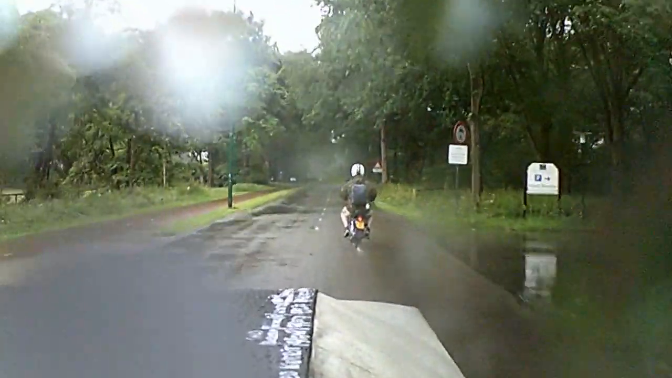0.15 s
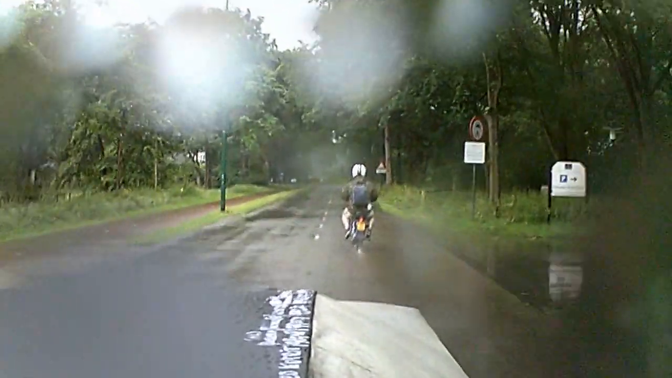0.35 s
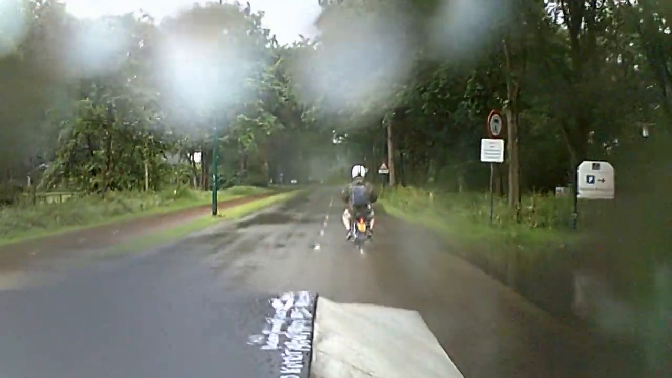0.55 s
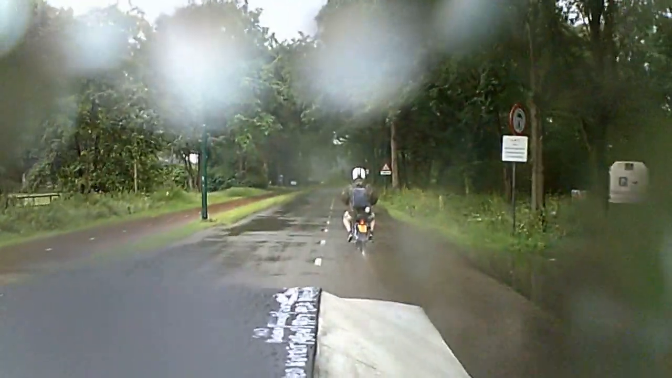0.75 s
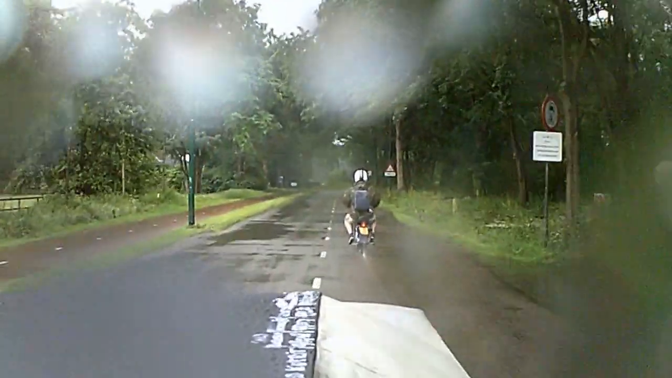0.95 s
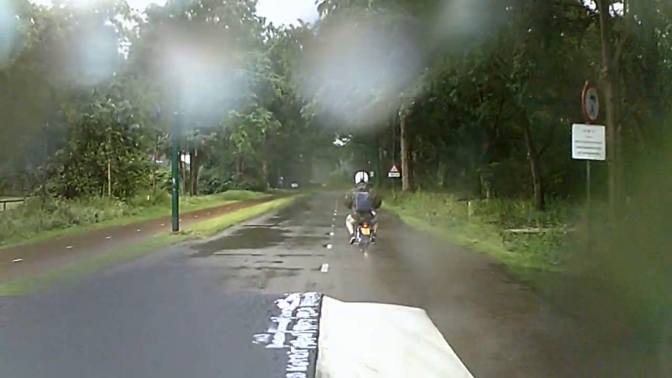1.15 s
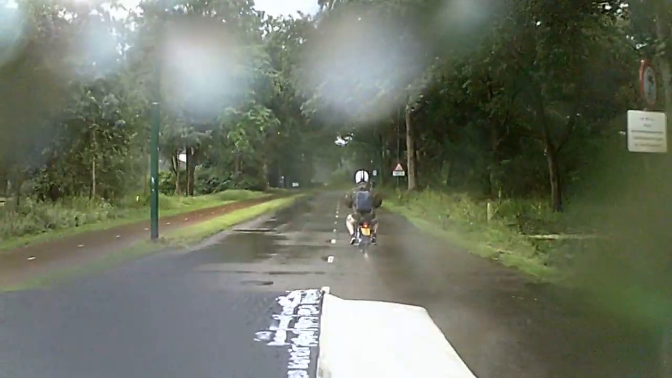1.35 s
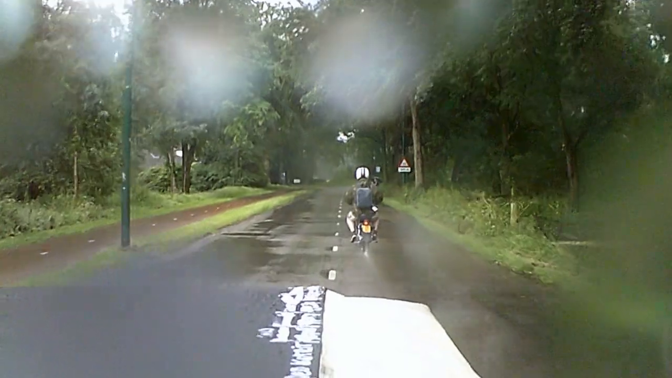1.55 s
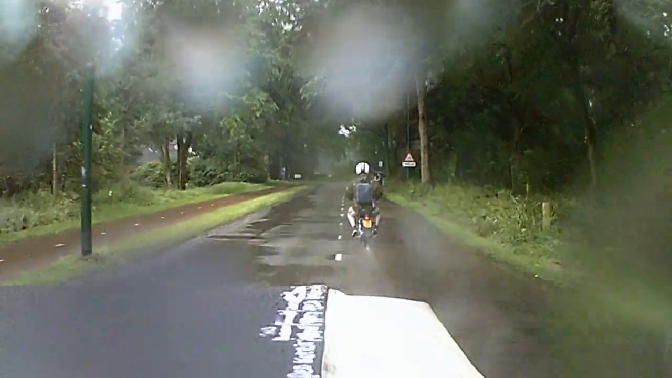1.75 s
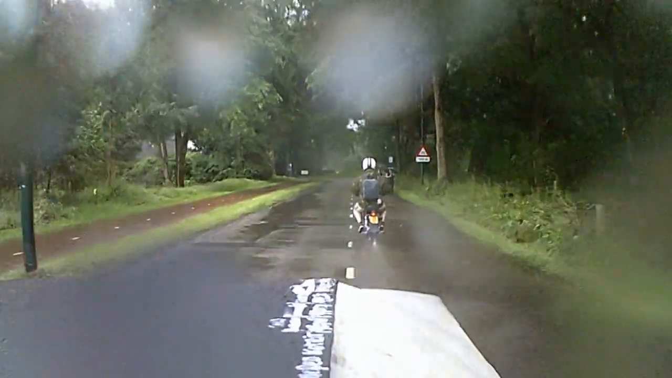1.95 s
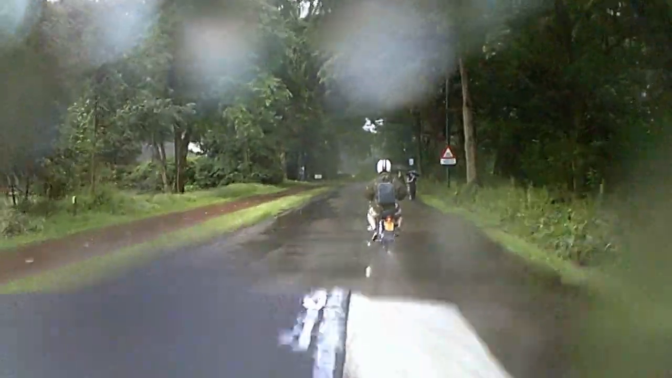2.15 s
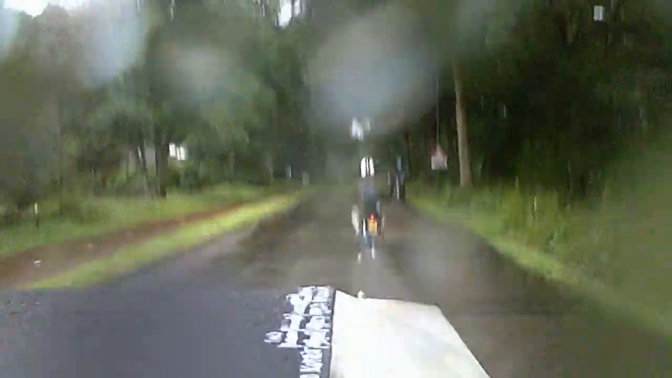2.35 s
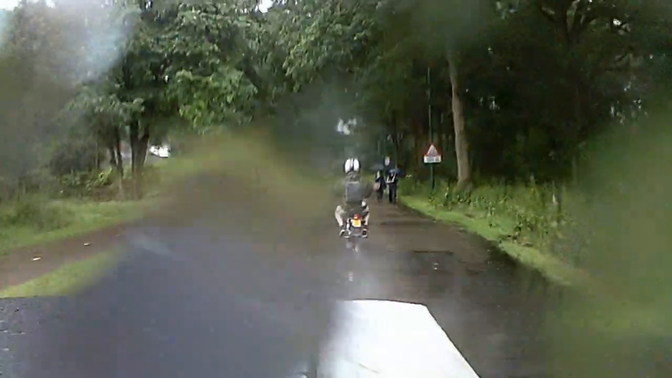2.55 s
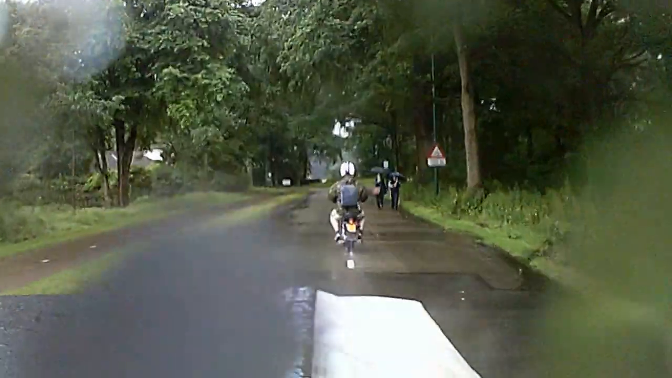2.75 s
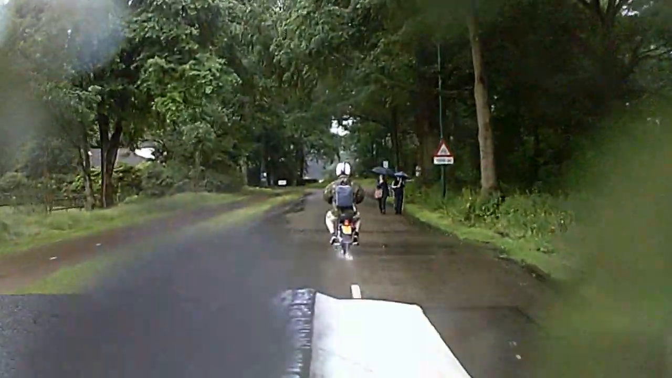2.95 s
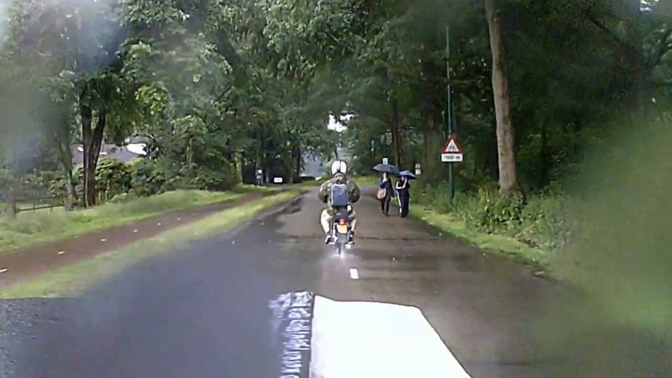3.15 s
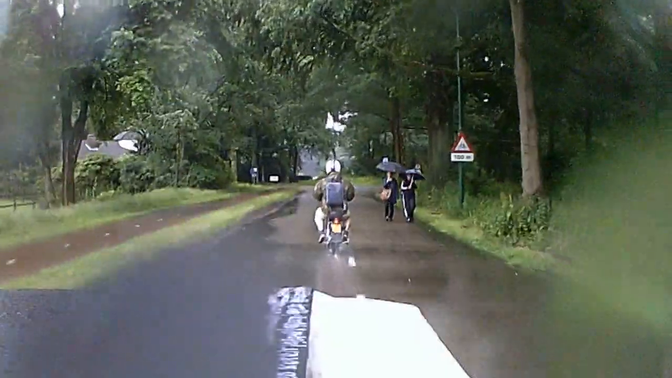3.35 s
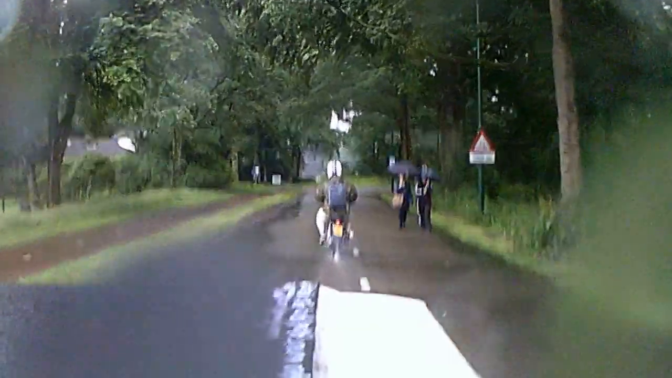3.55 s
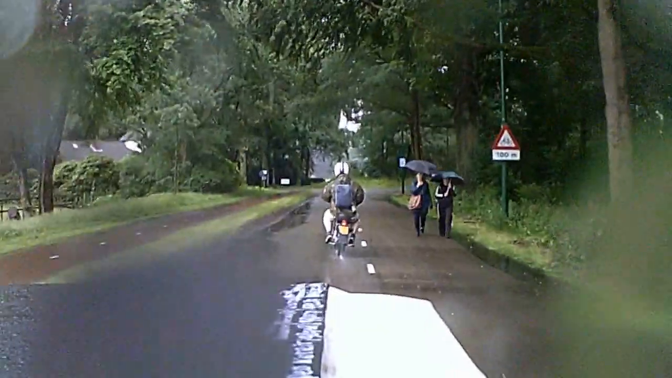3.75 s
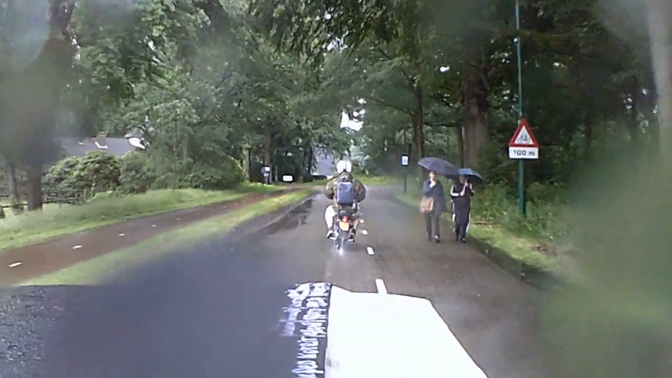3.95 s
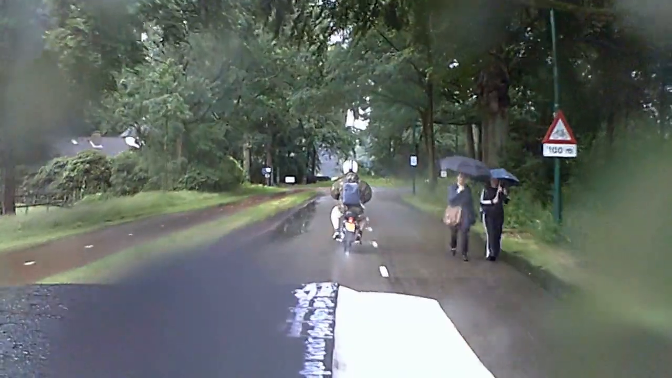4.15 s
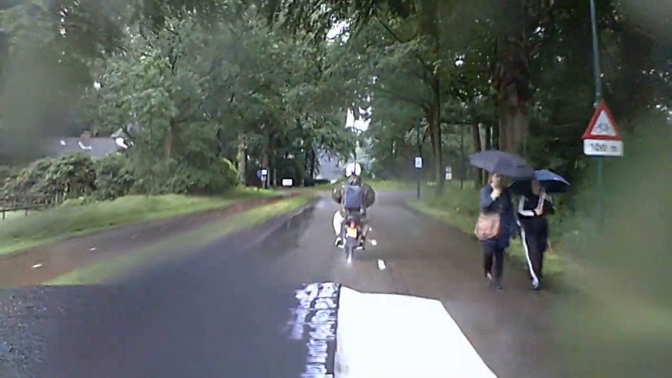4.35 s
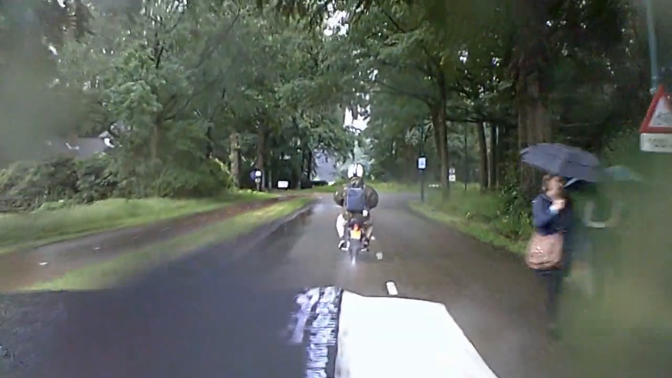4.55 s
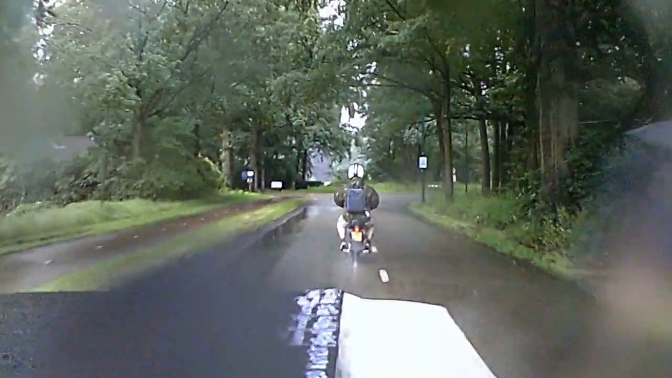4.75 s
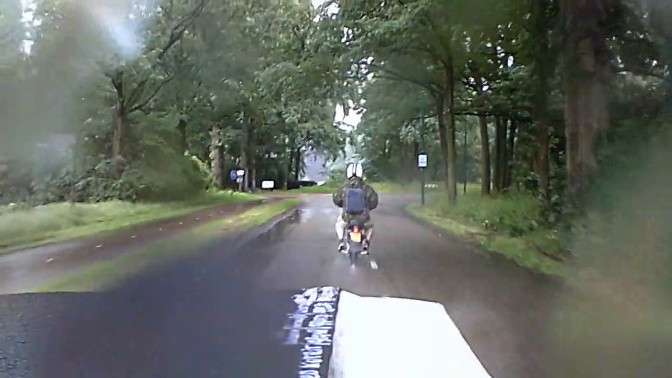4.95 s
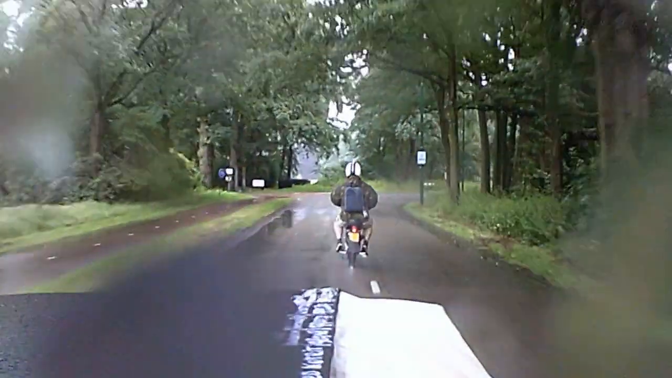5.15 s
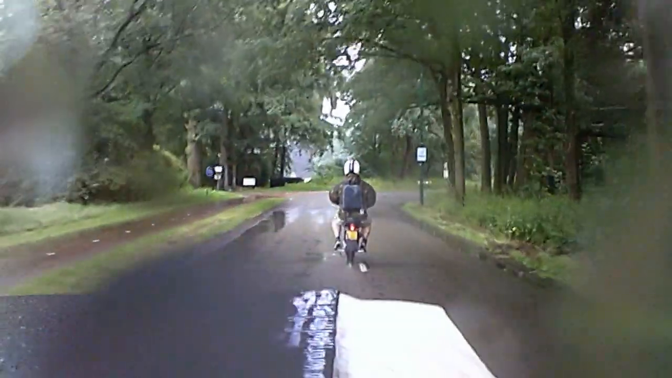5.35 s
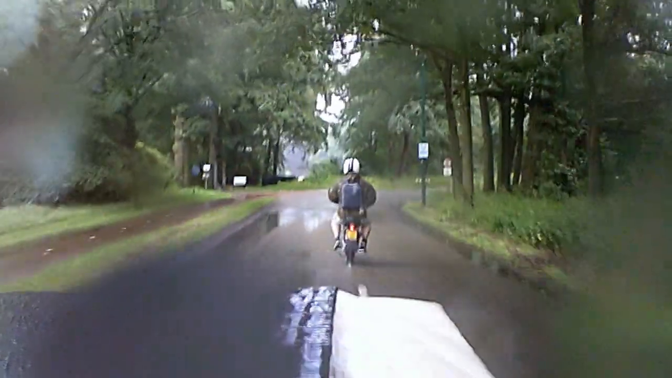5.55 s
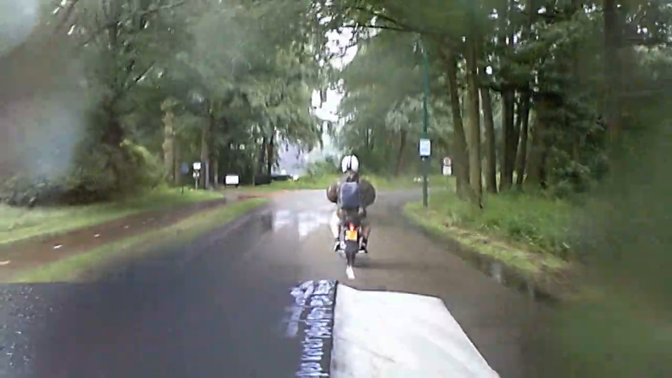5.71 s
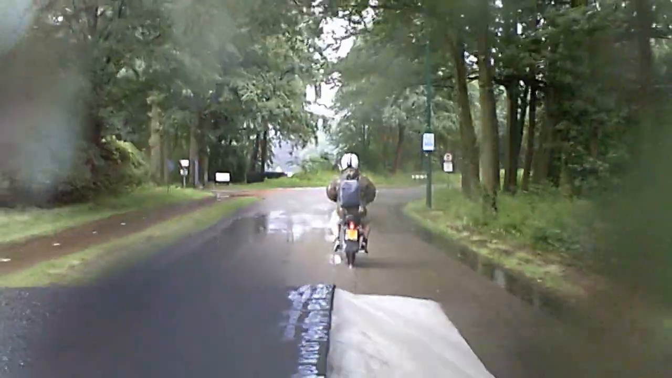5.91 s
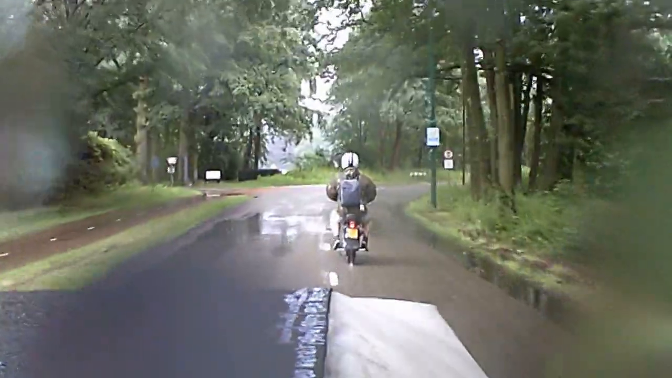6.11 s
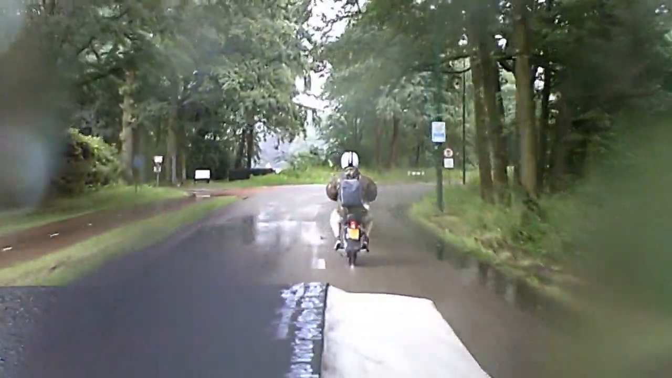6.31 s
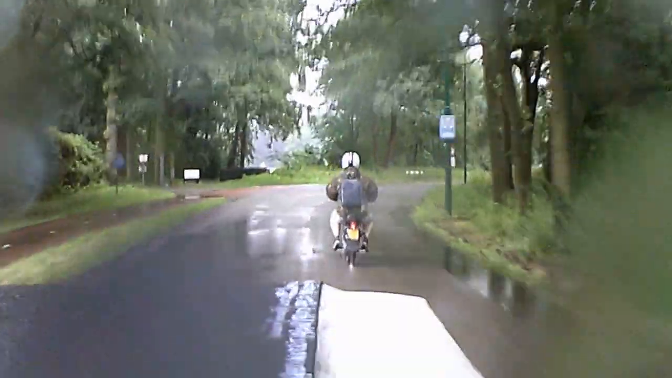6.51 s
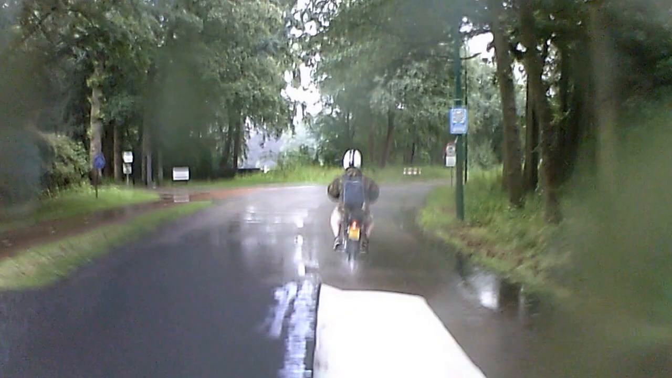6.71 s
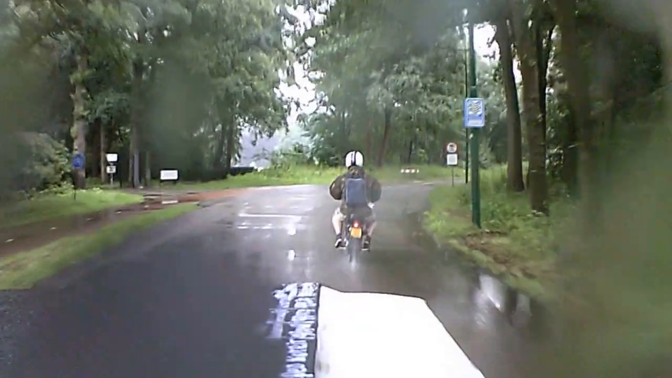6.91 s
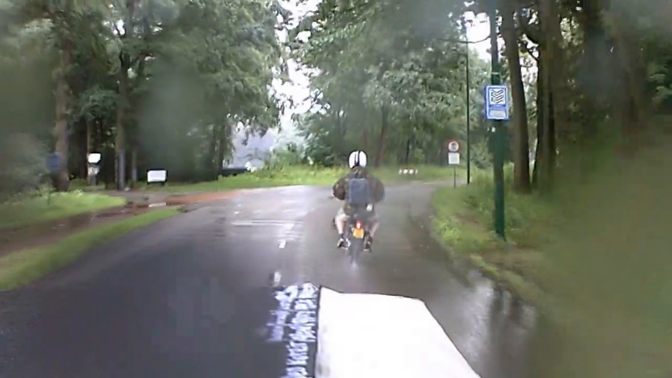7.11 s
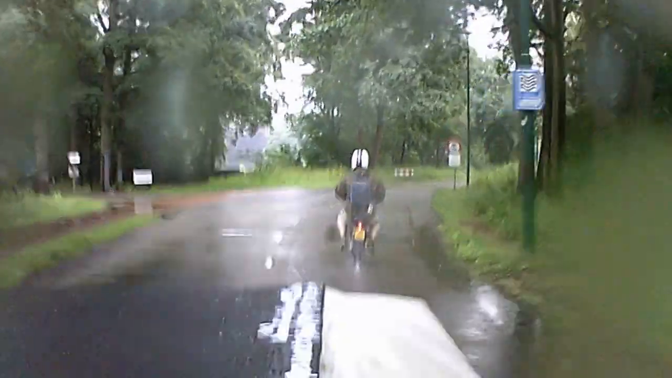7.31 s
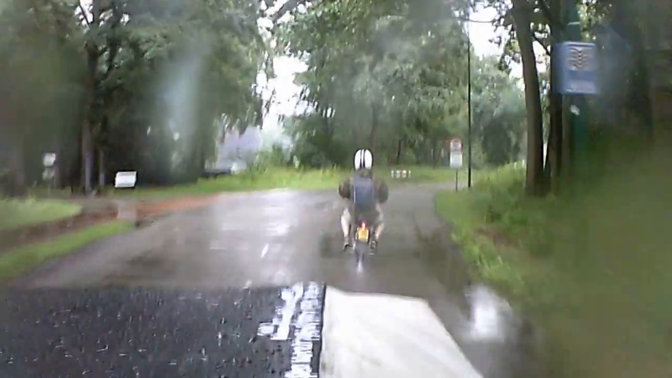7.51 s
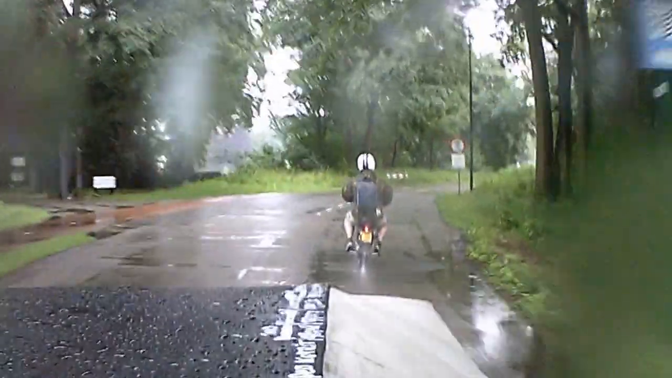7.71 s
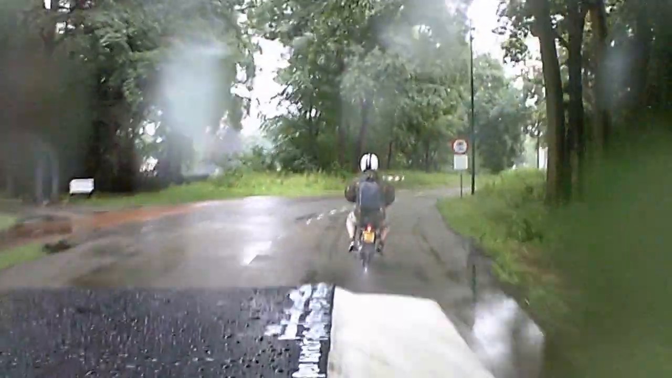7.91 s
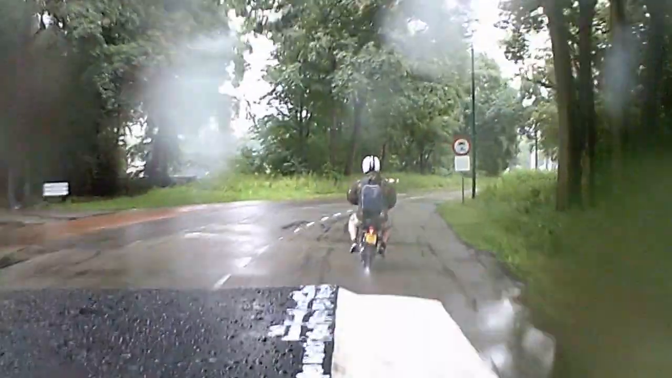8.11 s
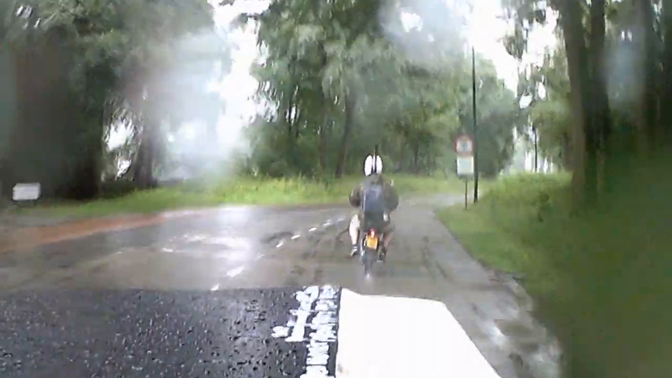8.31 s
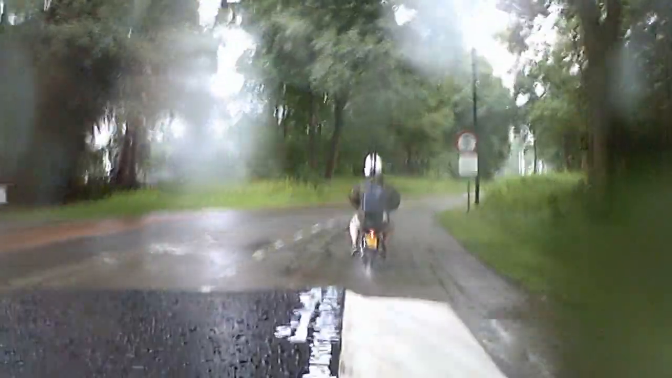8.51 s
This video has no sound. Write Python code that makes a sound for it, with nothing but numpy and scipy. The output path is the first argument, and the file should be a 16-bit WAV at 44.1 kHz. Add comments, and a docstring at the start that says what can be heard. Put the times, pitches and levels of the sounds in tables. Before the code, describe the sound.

A small single-cylinder moped engine runs on a wet road, heard by one microphone inside a mounted camera housing. Its low, buzzing drone and rapid soft firing thumps stay nearly constant, rising very slightly in pitch until about 6 s. Beneath are frame rumble and slow mount wobble; around it, patchy muffled tyre hiss. Fine rain and bigger drops tick irregularly on the plastic, with a sharp loud tap at 1.4 s. From 2.2 to 2.65 s, wet rubbing and a cluster of hard, hollow knocks rock the mount into crunching overload, worst near 2.45 s, with low shaking until 3 s. Another thud and wobble come around 3.3-3.7 s. Another strong drop clicks at 5.7 s. After 6 s the engine eases and drops slightly in pitch, its drone thinner and wavering; light knocks fall near 6.1 and 6.6 s, bright drops at 6.9 and 8 s. The ride continues to the end at 8.7 s.

```python
"""A small single-cylinder four-stroke runs along a wet road over hissing tyres, then eases off and
slows a little after six seconds. Place: inside a camera housing on its mount, one microphone, mono.
Engine tones and thumps come from the firing rate, frame rumble from noise in resonances, tyre hiss
from shaped noise. Raindrops and knocks ring sets of modes in the housing, bracket and frame;
a wipe across the housing and a hard knock rock the mount until the input overloads."""
import sys
import numpy as np
from scipy import signal
from scipy.fft import rfft, irfft, next_fast_len
from scipy.io import wavfile
from scipy.ndimage import uniform_filter1d

SR = 44100
rng = np.random.default_rng(int(sys.argv[2]) if len(sys.argv) > 2 else 0)


def store_pcm(level_fs):
    """Save levels as 16-bit WAV."""
    pcm = np.round(np.clip(level_fs, -1, 1) * 32767).astype(np.int16)
    wavfile.write(sys.argv[1], SR, np.atleast_2d(pcm).T)


def nominal_scale(level):
    """Amplitude ratio for a level in decibels (scalar or array-like)."""
    x = np.asarray(level, float) / 20
    return 10 ** x


N = 382347   # samples

# engine state: t/s, cruising 0-1, load/dB, crank tone rms level/dB, twice-crank tone rms level/dB
ENGINE_STATE = [(0, 0, 1, -23, -30), (1, 0, 0.5, -23, -36), (2, 0.22, -0.5, -20.5, -36.5),
                (3.5, 0.67, 0, -22, -33), (5, 1, -1.5, -23, -38), (5.9, 1, -3.5, -22, -35.5),
                (6.3, 0.87, -7.5, -23.5, -35), (6.6, 1, -6, -25.5, -28.5), (7.1, 0.9, -12, -26.5, -30.5),
                (7.4, 0.95, -9.5, -33.5, -26), (7.7, 0.98, -7.5, -31, -34), (7.9, 0.77, -13, -22.5, -41.5),
                (8.2, 0.8, -6, -28, -30.5), (8.67, 0.9, -4, -26, -40.5)]
# firing rate: t/s, f/Hz
FIRING_RATE = [(0, 38.4), (1, 38.7), (2, 39.0), (2.7, 39.2), (4.1, 39.3), (4.8, 39.48), (5.9, 39.56),
               (6.2, 39.1), (6.6, 38.1), (7.25, 37.75), (7.6, 37.25), (8.67, 37.5)]
# tones that follow the load: multiple of the firing rate, rms level pulling/dB, rms level cruising/dB
LOAD_TONES = [(3, -46, -46), (5, -43, -43), (6, -41, -41), (7, -40, -46), (8, -45, -53), (9, -51, -44),
              (10, -52, -50), (11, -55, -56), (12, -48, -55), (13, -54, -45), (14, -46, -49),
              (15, -45, -50), (16, -52, -53), (17, -53, -54), (18, -51, -52), (19, -55, -54),
              (20, -50, -48), (21, -52, -53), (22, -50, -51)]
# casing resonances thumped by each firing: f/Hz, width/Hz, relative level/dB
CASING_MODES = [(607, 34, 7.5), (851, 24, 2), (900, 22, -11.5), (1710, 260, -19)]
# road roughness in the frame: t/s, shake level/dB, extra level of the lowest resonance/dB
ROAD_SHAKE = [(0, -29.5, 6), (1.5, -31, -2), (3, -30.5, 3), (4.5, -30, 3.5), (5.8, -32, -5.5),
              (6.6, -27.5, -5.5), (7.4, -32, -3.5), (8.67, -29.5, -3)]
# frame resonances: f/Hz, width/Hz (before widening), level against the shake/dB
FRAME_MODES = [(42.23, 4.1, 1.5), (91.9, 5.4, -5), (171.9, 15, 1.5), (190.6, 21, -13), (219.8, 16, -13.5)]
# tyre hiss spectrum: f/Hz, relative density/dB per Hz
TYRE_SPECTRUM = [(8, 30), (40, 20), (120, 13), (250, 7), (420, 1), (700, 3), (1080, 6), (1300, -16),
                 (1750, -2), (2900, -17), (3600, -30), (4000, -35), (4350, -33), (5400, -47), (6900, -40),
                 (7800, -41)]
# mount bouncing over the road: t/s, rms level/dB
MOUNT_BOUNCE = [(0.03, -12), (0.15, -19.5), (0.3, -10.5), (0.43, -18.5), (0.62, -9), (0.85, -16),
                (1.15, -26.5), (1.5, -17.5), (2.15, -15.5), (3.04, -28), (3.2, -21.5), (3.98, -30.5),
                (4.22, -16.5), (4.64, -20.5), (4.85, -14), (5.14, -22.5), (5.65, -15), (6.06, -23.5),
                (6.57, -14.5), (6.95, -14), (7.17, -24.5), (7.5, -10), (7.75, -14.5), (8.23, -26.5),
                (8.45, -9.5), (8.67, -13.5)]
# mount rocking, one list a shove: t/s, f/Hz, peak level/dB
MOUNT_ROCKING = [
    [(2.265, 14.5, 0), (2.36, 13, 0), (2.42, 10, 0), (2.5, 11, 2), (2.56, 15, 0), (2.63, 10, -11),
     (2.7, 13.5, -8), (2.77, 16.5, -4), (2.92, 17, -10), (3.0, 17, -40)],
    [(3.37, 17, -5), (3.41, 16.5, -1), (3.45, 17, -1), (3.5, 17.5, -12), (3.56, 17, -7), (3.62, 17, -10),
     (3.69, 17, -5), (3.85, 17, -8), (3.95, 17, -45)],
]
# big drops on the housing: t/s, body drive level/dB, edge drive level/dB, splash drive level/dB,
# body brightness/dB per octave
BIG_DROPS = [(0.063, -29.5, -49, -70, 0), (0.1664, -26.5, -48, -46, 6), (0.1946, -29.5, -45, -41.5, 5),
             (0.367, -28, -52, -60, 0), (0.4462, -26, -52, -56, 0), (0.585, -30.5, -65, -70, 12),
             (0.8027, -22.5, -44, -41, 0), (1.1093, -27.5, -54, -48, 5), (1.2766, -26.5, -49.5, -53, 3),
             (1.375, -7, -32.5, -29, 3), (1.4029, -15.5, -45, -45, -9), (1.5304, -31, -52, -51, 2),
             (1.5644, -38, -54, -52, 9), (1.7068, -19.5, -49, -52, 1), (1.7735, -50, -59, -50, -1),
             (1.7865, -39, -54, -51, 3), (1.813, -30, -58, -44, 2), (1.9198, -32, -54, -49, 0),
             (2.5907, -52, -59, -43, 5), (2.6362, -26, -63, -34.5, -2), (2.98, -35, -53, -49, 2.5),
             (3.07, -20.5, -44, -49, 4), (3.1082, -26.5, -49, -52, 3), (3.3271, -31, -62, -38.5, 0),
             (3.3704, -17.5, -38, -36, 2), (3.4654, -26.5, -72, -69, 12), (3.7609, -27.5, -49, -62, 5),
             (3.8832, -24, -48, -51, 11), (3.987, -19.5, -49, -44.5, 6), (4.0348, -39, -44.5, -51, -2),
             (4.157, -25.5, -55, -48, 3), (4.2226, -38, -57, -44, 0), (4.5938, -27, -47, -46, 3),
             (4.614, -29, -59, -44, 3), (4.6775, -18, -50, -53, -1), (4.707, -26.5, -52, -50, 0),
             (4.8769, -31.5, -48, -80, 0), (5.134, -34, -53, -65, 9), (5.2579, -35, -52, -54, 8),
             (5.3197, -31, -48, -57, 1), (5.4993, -29, -49, -41, 3), (5.6798, -10, -39, -29.5, -4),
             (5.7178, -49, -58, -45, 2), (5.7723, -34, -44, -44, -1), (5.93, -30, -58, -49, 0),
             (6.1458, -25, -59, -47.5, 3), (6.372, -28, -53, -40, 6), (6.5316, -26.5, -50, -44.5, -2),
             (6.6073, -21.5, -64, -70, 3), (6.6317, -33, -50, -39.5, 0), (6.6612, -21.5, -58, -51, 5),
             (6.7136, -33, -54, -53, 3), (6.8805, -20, -38, -27.5, 2), (6.8991, -15, -41, -31, -2),
             (7.373, -26.5, -54, -52, -3), (7.444, -46, -53, -47, 0), (7.8946, -32, -56, -44, 0),
             (7.9634, -10, -36.5, -44, 27), (8.0527, -27, -42, -53, 17), (8.0682, -34, -59, -45, 0),
             (8.1064, -37, -71, -48, 0), (8.191, -35, -65, -47, 2), (8.211, -27.5, -52, -60, 3),
             (8.253, -24, -45.5, -43, 0), (8.299, -18.5, -44, -48, 4)]
# housing modes struck by a drop: f/Hz, relative level/dB, t60/s, part (0 body, 1 edge, 2 splash)
HOUSING_MODES = [(1050, -18, .012, 0), (1710, 0, .019, 0), (2030, -1, .017, 0), (2400, -9, .013, 0),
                 (2800, -13, .016, 0), (3600, -1, .012, 1), (4320, -1, .012, 1), (5100, -6, .01, 1),
                 (6450, -6, .008, 2), (6880, -1, .010, 2), (7650, 5, .006, 2)]
# dull knocks on the mount: t/s, bracket drive level/dB, frame drive level/dB
MOUNT_KNOCKS = [(0.58, -25.5, -35), (0.941, -27, -34), (2.261, -9, -18), (2.269, -11.5, -18.5),
                (2.307, -10.5, -15.5), (2.359, -7.5, -18), (2.389, -16.5, -22.5), (2.408, -12.5, -17.5),
                (2.433, -10, -18), (2.441, 1, -9), (2.452, -2.5, -11.5), (2.482, -14.5, -20),
                (2.507, -7.5, -15.5), (2.539, -19, -18.5), (2.59, -24, -22), (3.302, -20, -28),
                (3.369, -5, -15), (3.423, -26, -10.5), (3.504, -20.5, -17), (3.543, -25, -22.5),
                (3.7, -25, -24), (5.432, -31, -35), (6.145, -17.5, -27), (6.609, -14.5, -22),
                (7.964, -24, -29.5)]
# bracket modes rung by a knock: f/Hz, relative level/dB, t60/s
BRACKET_MODES = [(562.5, -6.5, 0.043), (844, -3.5, 0.025), (968.3, 3, 0.026), (1160, -23, 0.023),
                 (2040, -18, 0.0046), (2690, -24.5, 0.022), (5040, -40.5, 0.0027), (7000, -40, .008)]
# frame modes rung by a knock: f/Hz, relative level/dB, t60/s
KNOCKED_FRAME_MODES = [(124.7, -5.5, .2), (173, 1, 0.35), (234.2, -7.5, 0.21), (330, -12, 0.11)]
# rubbing across the housing: t/s, level/dB
WIPE_LEVEL = [(2.225, -40), (2.25, -21.5), (2.3, -23), (2.4, -18), (2.445, -12.5), (2.47, -19.5),
              (2.51, -15), (2.6, -25), (2.65, -28.5)]
# rubbing spectrum: f/Hz, relative density/dB per Hz
WIPE_SPECTRUM = [(35, -33), (60, 5), (140, -13.5), (179, 2.5), (233, -9.5), (475, -14), (983, -12.5),
                 (1300, -43), (2250, -23.5), (3130, -53.5), (4070, -74), (6890, -120)]


def rms_one(x):
    """Scale to rms 1."""
    return x / np.sqrt(np.mean(x ** 2) + 1e-20)


def in_time(rows):
    """Columns of a timed table, interpolated to one value a sample."""
    s, *columns = np.transpose(rows)
    return [np.interp(np.arange(N) / SR, s, c) for c in columns]


def during(rows):
    """1 while the table lasts, else 0."""
    t = np.arange(N) / SR
    return (t >= rows[0][0]) & (t < rows[-1][0])


def drift(corner_hz):
    """Slow random wandering of spread 1: noise through two equal poles, made at SR / 40."""
    r = np.exp(-80 * np.pi * corner_hz / SR)
    noise = rng.standard_normal(N // 40 + 2002)
    slow = signal.lfilter([1], [1, -2 * r, r * r], noise)[2000:]   # past the settling
    return np.interp(np.arange(N) / 40, np.arange(len(slow)), rms_one(slow - slow.mean()))


def coloured(spectrum):
    """Noise shaped by a spectrum, silent below its first row and fading past its last; rms 1."""
    size = next_fast_len(N)
    hz = np.arange(1, size // 2 + 2) * SR / size
    at, db = np.transpose(spectrum)
    shape = nominal_scale(np.interp(np.log(hz), np.log(at), db))
    shape = shape * (hz > at[0]) / (1 + (hz / (1.2 * at[-1])) ** 20)
    return rms_one(irfft(rfft(rng.standard_normal(size)) * shape, size)[:N])


def below(x, hz):
    """Steep low-pass."""
    return signal.sosfilt(signal.butter(4, hz, fs=SR, output="sos"), x)


def resonance(x, hz, width_hz):
    """Two-pole band-pass with gain 1 on top."""
    r = np.exp(-np.pi * width_hz / SR)
    poles = [1, -2 * r * np.cos(2 * np.pi * hz / SR), r * r]
    return signal.lfilter([(1 - r * r) / 2, 0, (r * r - 1) / 2], poles, x)


def ring(clicks, hz, t60):
    """A unit click sets a decaying sine ringing from height 1."""
    r, w = nominal_scale(-60 / (t60 * SR)), 2 * np.pi * hz / SR
    return signal.lfilter([0, np.sin(w)], [1, -2 * r * np.cos(w), r * r], clicks + 1e-18)


def struck(seconds, gains, hz, t60):
    """Soft contacts ring one mode: nothing far from its pitch, so the ring swells for a cycle or two."""
    clicks = np.zeros(N)
    np.add.at(clicks, (np.asarray(seconds) * SR).astype(int), gains)
    edges = [max(hz / 1.5, hz - 800), min(hz * 1.35, hz + 800)]
    contact = signal.butter(2, edges, "band", fs=SR, output="sos")
    soft = signal.sosfilt(contact, clicks + 1e-18)
    return ring(below(soft, 1.28 * hz), hz, t60)


def engine():
    """Wavering sines on multiples of the firing rate, and one thump a firing in the casing."""
    firing_db = -42.5   # thump rms at load 0 dB
    cruising, load_db, crank_db, twice_db = in_time(ENGINE_STATE)
    firings = np.cumsum(in_time(FIRING_RATE)[0] * (1 + .001 * drift(2))) / SR
    # the crank turns twice a firing
    tones = nominal_scale(crank_db + 1.5 * drift(4)) * np.sin(4 * np.pi * firings)
    tones += nominal_scale(twice_db + 1.5 * drift(4)) * np.sin(8 * np.pi * firings)
    for multiple, pulling_db, cruising_db in LOAD_TONES:
        db = pulling_db + np.clip(cruising, 0, 1) * (cruising_db - pulling_db)
        level = nominal_scale(db + load_db + 2.2 * drift(5))
        tones += level * np.sin(2 * np.pi * (multiple * firings + rng.random()))
    bang = rms_one(np.diff(np.floor(firings), prepend=0))
    # a puff of gas noise trails each bang
    gas = rms_one(np.exp(-(firings % 1) / 0.3) * rng.standard_normal(N))
    burst = (0.8 * bang + gas) * nominal_scale(2.0 * drift(15))
    thump = sum(nominal_scale(db) * rms_one(resonance(burst, hz, width)) for hz, width, db in CASING_MODES)
    thump = rms_one(below(thump, 2500))
    return np.sqrt(2) * tones + nominal_scale(firing_db + .5 * load_db) * thump


def road():
    """Road roughness rings the frame; spray and tread make a patchy hiss."""
    tyre_db = -48.5   # hiss rms between 1300 and 3000 Hz, before its patches
    shake_db, lowest_db = in_time(ROAD_SHAKE)
    rough = rng.standard_normal((2, N))   # shared by alternate resonances
    frame = np.zeros(N)
    for k, (hz, width, db) in enumerate(FRAME_MODES):
        once = resonance(rough[k % 2], hz, 1.19 * width)
        twice = resonance(once, hz, 1.19 * width)
        frame += nominal_scale(db + (k == 0) * lowest_db) * rms_one(twice)
    hiss = coloured(TYRE_SPECTRUM)
    band_pass = signal.butter(4, [1300, 3000], "band", fs=SR, output="sos")
    band = signal.sosfilt(band_pass, hiss)
    patches_db = 1.0 * drift(6.6) + 2.0 * drift(39)
    hiss = hiss / np.std(band) * nominal_scale(patches_db)
    return nominal_scale(shake_db) * frame + nominal_scale(tyre_db) * hiss


def rocking():
    """Each shove swings the mount from rest and overrides the road's bounce; else its sway rate wavers."""
    mount_hz, waver_hz = 16.8, 2.0
    swing, shoved = np.zeros(N), np.zeros(N)
    for rows in MOUNT_ROCKING:
        hz, db = in_time(rows)
        swing += during(rows) * nominal_scale(db) * np.sin(2 * np.pi * np.cumsum(hz * during(rows)) / SR)
        shoved += during(rows)
    sway_hz = mount_hz + waver_hz * drift(3.145)
    sway = np.sqrt(2) * np.sin(2 * np.pi * np.cumsum(sway_hz) / SR)
    bounce = nominal_scale(in_time(MOUNT_BOUNCE)[0] + 1.45 * drift(6.7))
    unshoved = uniform_filter1d(1 - shoved, size=2000)
    return swing + unshoved * bounce * sway


def rain():
    """Big drops as listed, small drops and fine rain at random; each strikes every mode a little differently."""
    fine_per_s, small_per_s = 81, 9
    # drive levels/dB for body, edge, splash, before the random spreads and flurries
    fine_base_db = [-63.5, -79, -68.5]
    small_base_db, small_range_db = [-43, -60, -54], [24, 16, 12]
    fine = rng.random((int(fine_per_s * N / SR), 5))
    fine_size_db = -3.5 * np.log(1 - .95 * fine[:, 1:2])   # a few drops are much larger
    fine_db = fine_base_db + fine_size_db + 8.0 * (fine[:, 2:] - .5)
    small = rng.random((int(small_per_s * N / SR), 4))
    small_db = small_base_db + small_range_db * (small[:, 1:] - .5)
    # the random drops swell and fade in flurries, the small ones half as much
    flurry_db = 3.5 * drift(1.7)
    small_db = small_db + flurry_db[(small[:, 0] * (N - 1)).astype(int), None] / 2
    fine_db = fine_db + flurry_db[(fine[:, 0] * (N - 1)).astype(int), None]

    big = np.array(BIG_DROPS)
    seconds = np.concatenate([big[:, 0], small[:, 0] * (N - 1) / SR, fine[:, 0] * (N - 1) / SR])
    drive_db = np.vstack([big[:, 1:4], small_db, fine_db])
    bright = np.append(big[:, 4], np.zeros(len(seconds) - len(big)))
    spread_db = 2.0 * rng.standard_normal((len(seconds), len(HOUSING_MODES)))
    out = np.zeros(N)
    for k, (hz, db, t60, part) in enumerate(HOUSING_MODES):
        # brightness tilts the body about 1900 Hz, at most a quarter octave's worth
        octaves = np.clip(np.log2(hz / 1900), -.25, .25)
        tilt_db = (part == 0) * bright * octaves
        gains = nominal_scale(drive_db[:, int(part)] + db + tilt_db + spread_db[:, k])
        out += struck(seconds, gains, hz, t60)
    return out


def knocks():
    """Duller blows ring the bracket and the frame, each mode a little differently."""
    seconds, bracket_db, frame_db = np.transpose(MOUNT_KNOCKS)
    modes = [(bracket_db, *m) for m in BRACKET_MODES] + [(frame_db, *m) for m in KNOCKED_FRAME_MODES]
    spread_db = 1.5 * rng.standard_normal((len(seconds), len(modes)))
    return sum(struck(seconds, nominal_scale(drive_db + db + spread_db[:, k]), hz, t60)
               for k, (drive_db, hz, db, t60) in enumerate(modes))


def wipe():
    """Wet rubbing: coloured noise that grips and slips, its level wandering fast."""
    slips_db = 2.5 * drift(40)
    rubbing = coloured(WIPE_SPECTRUM[1:-1])   # the outermost rows are left out
    return during(WIPE_LEVEL) * nominal_scale(in_time(WIPE_LEVEL)[0] + slips_db) * rubbing


def scene():
    """All sources add up at one microphone in the housing."""
    return (engine() + road() + rocking() + rain() + knocks() + wipe())[None]


def low_pass(x):
    """Removes everything above the highest recorded frequency."""
    return signal.sosfilt(signal.butter(12, 16100, fs=SR, output="sos"), x)


def record(dry):
    """The microphone input overloads hard, the top is cut steeply, and the peaks are clipped again."""
    overload = .71   # of full scale
    flat = np.clip(dry, -overload, overload)
    top_cut = signal.cheby2(10, 45, 8500, fs=SR, output="sos")   # 45 dB down from 8500 Hz up
    narrow = signal.sosfilt(top_cut, flat)
    return low_pass(np.clip(narrow, -overload, overload))


dry = scene()
out = record(dry)
store_pcm(out)
```